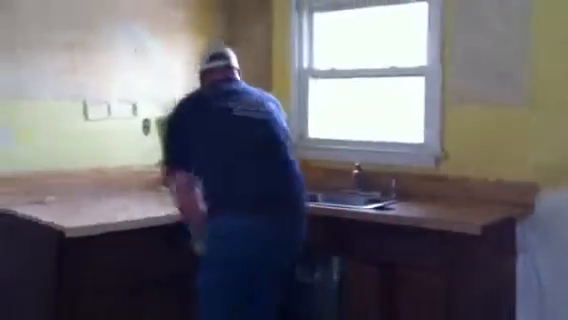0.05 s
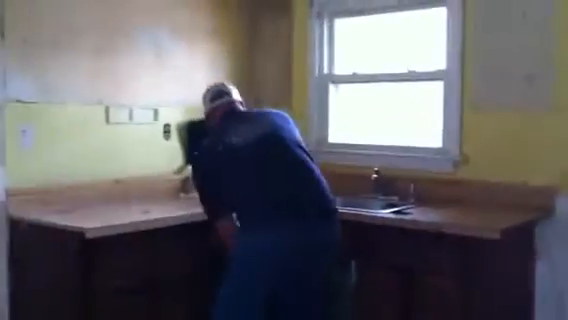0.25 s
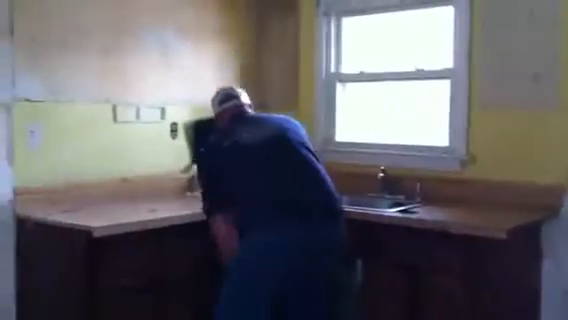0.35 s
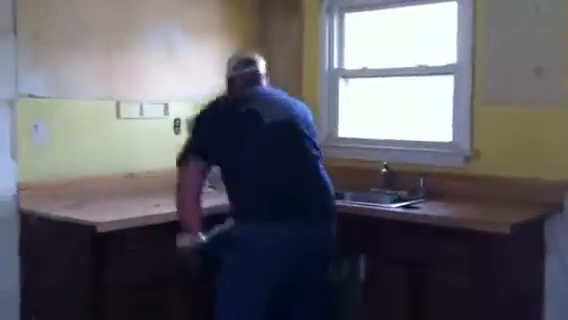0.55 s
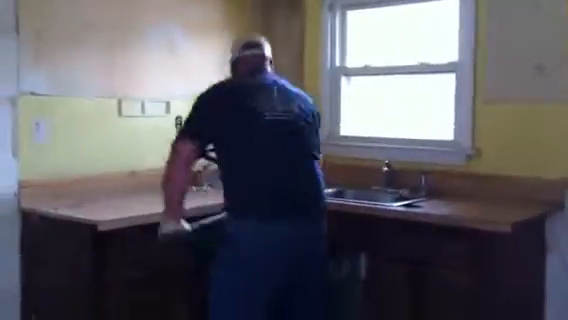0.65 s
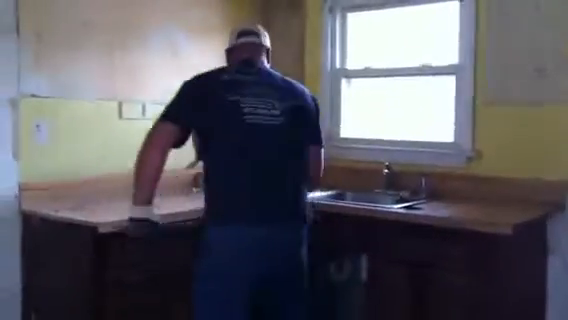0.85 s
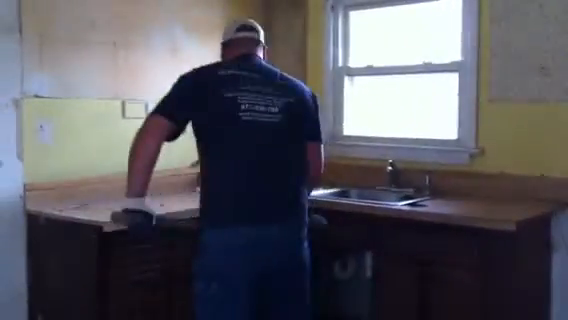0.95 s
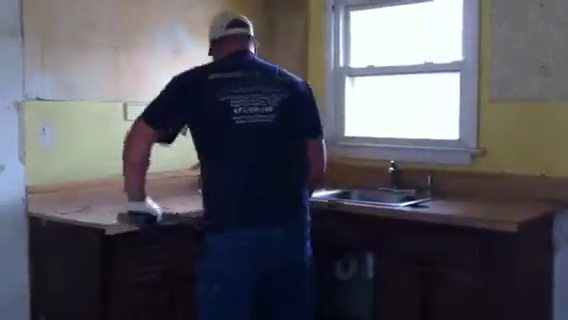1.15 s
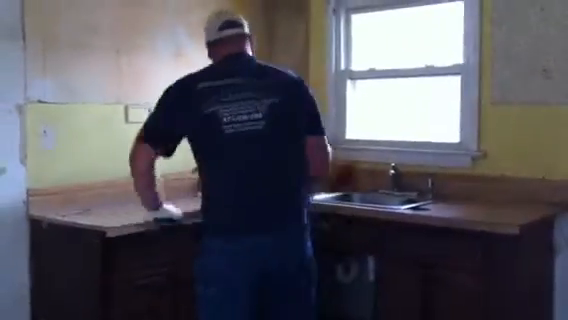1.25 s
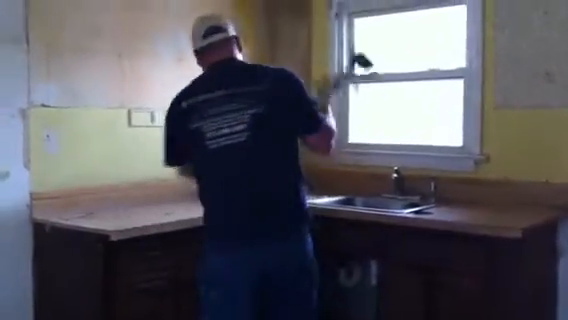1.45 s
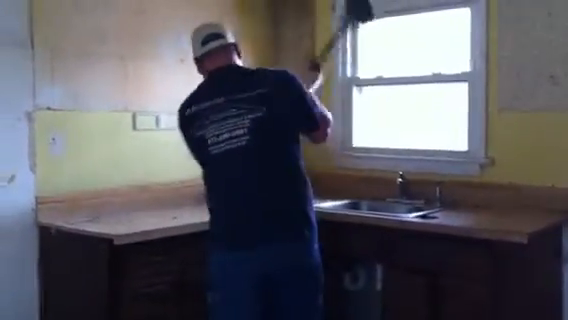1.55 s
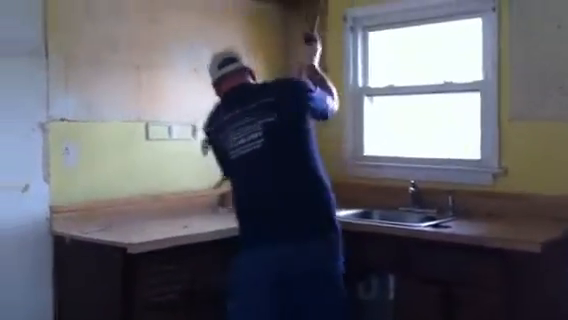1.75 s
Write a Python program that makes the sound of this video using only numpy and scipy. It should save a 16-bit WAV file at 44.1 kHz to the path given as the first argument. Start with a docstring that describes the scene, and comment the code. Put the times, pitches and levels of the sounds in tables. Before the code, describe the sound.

Wood breaks and drags in an empty, echoing kitchen, heard from a few steps away: scrapes and cracks build to a booming crash, clatter on briefly, then a sharp countertop knock, soft rubbing, a light tap and quiet.

```python
"""Cabinet panel wrenched loose in a bare kitchen

The panel scrapes, a nail squeaks, wood cracks, then it crashes down with a carcass boom and splinters.
A hard knock on the countertop, dull rubs, a light tap, a sleeve rustle as the hammer is raised, and grit.
Breaks, drag and nail are random clicks, filtered; carcass and countertop are decaying modes; rubs and air
are coloured noise. Bare walls ring after all but the two sets of modes and the air."""
import sys
import numpy as np
from scipy import signal
from scipy.fft import rfft, irfft, next_fast_len
from scipy.io import wavfile

SR = 44100
rng = np.random.default_rng(int(sys.argv[2]) if len(sys.argv) > 2 else 0)


def digitize_waveform(pressure):
    """Quantize a signal to 16-bit integers and store it at the path in sys.argv[1].

    Rows of a 2-D input are taken as channels; values are limited to [-1, 1].
    """
    field = np.atleast_2d(pressure).T
    bounded = np.clip(field, -1, 1)
    quanta = np.round(bounded * 32767).astype(np.int16)
    wavfile.write(sys.argv[1], SR, quanta)


N = 79380
T = np.arange(N) / SR
HZ = np.maximum(np.fft.rfftfreq(2 * N, 1 / SR), 1)

# cracks and crashes: (start [s], splintering decay [s], thud [dB], wood [dB], crack [dB], splinter [dB])
BREAKS = [(0.028, 0.0069, -76, -70, -52.5, -66), (0.0435, 0.0071, -42.5, -54.5, -42, -56.5),
          (0.122, 0.0031, -49, -54, -59, -70), (0.152, 0.0018, -45.5, -56, -57, -64.5),
          (0.259, 0.007, -44, -55, -43, -52), (0.313, 0.0099, -34.5, -40, -46, -55.5),
          (0.368, 0.033, -39.5, -49.5, -47.5, -54.5), (0.561, 0.0073, -37.5, -45, -44, -59),
          (0.594, 0.039, -49, -49, -63, -56), (0.632, .010, -34.5, -57, -53, -68),
          (0.648, 0.014, -33, -36.5, -32.5, -40), (0.672, 0.024, -28, -38.5, -43, -66),
          (0.769, 0.021, -57, -40, -38, -43), (0.797, 0.0066, -70, -42, -54, -52),
          (0.853, 0.031, -53, -45, -40.5, -46.5), (0.915, 0.023, -52, -49, -61, -68),
          (1.064, .016, -56.5, -52.5, -59, -83)]
# lower edges of thud, wood, crack and splinter: [Hz]
BAND_EDGES_HZ = [95, 430, 1500, 5300]
# colour of breaking wood: (frequency [Hz], gain [dB])
WOOD_COLOUR = [(60, -19.5), (130, -3), (300, 6.5), (480, -3.5), (900, 2), (1500, -7.5), (3500, -6.5),
               (4800, -9.5), (6500, -15), (10500, -11.5), (13000, -16), (16000, -27.5)]
SNAPS_PER_S, SNAP_SPREAD = 1800, 0.9  # spread: log-size deviation

# carcass modes: (frequency [Hz], level [dB], T60 [s])
CARCASS_MODES = [(115.4, -16, 0.36), (153.5, 2.5, 0.39), (204.9, 4.5, 0.32), (242.8, -7, 0.91),
                 (264, -13.5, .6), (306.7, -7, 0.83), (373, -24, 0.25), (427.5, -10.5, 0.39),
                 (612.5, -13.5, 1), (693, -14.5, 0.84), (874, -16.5, 1), (898, -29, 0.52)]
# heavy blows on the carcass: (time [s], level [dB])
BOOMS = [(0.316, -30.5), (0.660, -12.5)]
BOOM_RISE_S = 0.0091

# panel drag and sliding debris: (time [s], level [dB])
DRAG_LEVEL = [(0, -24.5), (.1, -35), (.21, -26.5), (.27, -25.5), (.34, -30.5), (.44, -27), (.53, -31.5),
              (.63, -31.5), (.72, -23), (.82, -27), (.9, -59), (.97, -65), (1.1, -76), (1.8, -71)]
# colour of wood dragged on wood: (frequency [Hz], gain [dB])
DRAG_COLOUR = [(30, -37.5), (70, -15.5), (150, 1.5), (260, 4), (400, -1.5), (520, -4), (900, -7.5),
               (1800, -12), (3800, -13), (6500, -18), (10500, -24.5), (16000, -32)]
SLIPS_PER_S, SLIP_SPREAD = 1400, 0.51

# resonances of a nail pulling out: (frequency [Hz], width [Hz], gain [dB])
NAIL_RESONANCES = [(2690, 420, -1.5), (3560, 300, 3.5), (5630, 180, -4)]
NAIL_START_S, NAIL_DECAY_S, NAIL_DB = 0.259, 0.012, -42

# knocks on the countertop: (time [s], level [dB], treble tilt [dB/octave])
KNOCKS = [(1.1523, -37, 0.5), (1.522, -57, 1)]
# colour of the contact before tilt: (frequency [Hz], gain [dB])
KNOCK_COLOUR = [(60, -22), (150, -8), (280, 2), (420, -6.5), (700, -1.5), (1150, 3), (1600, -3),
                (2300, -5.5), (4700, -8), (6000, -23), (11000, -22), (16000, -36)]
# countertop modes: (frequency [Hz], level [dB], T60 [s])
COUNTER_MODES = [(1012, -3, .5), (1081, 0, .42), (1171, -9, .38), (1245, -6, .38), (2051, -10, .28),
                 (2126, -9, .35), (2607, -8, .2), (4620, -16, .42), (4790, -16, .42)]
CONTACT_RISE_S = 0.0009  # the contact softens in: time constant of its onset [s]
CHATTER_DECAY_S = 0.0093
CHATTER_DB, COUNTER_RING_DB = -2, 6  # re first contact, re clack

# soft rubs: (peak time [s], Gaussian half length [s], level [dB], centre [Hz], Gaussian width [octaves])
RUBS = [(1.313, 0.028, -37, 1010, 0.55), (1.324, 0.08, -40.5, 296, 0.41), (1.414, 0.066, -42.5, 754, 0.29),
        (1.689, 0.041, -48, 3140, 1.2)]

# landing crumbs of grit: (time [s], level [dB])
GRIT = [(1.28, -65.5), (1.355, -73), (1.438, -76.5), (1.564, -80), (1.614, -80)]
GRIT_LO_HZ, GRIT_HI_HZ = 4500, 12000

# colour of the quiet air: (frequency [Hz], gain [dB])
AIR_COLOUR = [(30, -28), (80, -4), (150, 14), (300, 7.5), (500, 0), (1000, 4.5), (2000, 4), (4500, -6.5),
              (7000, -16.5), (16000, -19)]
AIR_DB = -48.5

# room reverberation: (frequency [Hz], T60 [s])
ROOM_T60 = [(100, 0.62), (300, 0.55), (1000, 0.58), (2500, 0.66), (5000, 0.5), (10000, 0.43), (16000, 0.22)]
DIRECT_DB, EARLY_DB = -5.5, -1.5  # re tail, before the whole response is normalised
EARLY_DECAY_S, ROOM_GAP_S = 0.012, 0.001

TOP_HZ = 15850


def amp(db):
    """Decibels to gain."""
    return 10 ** (np.asarray(db) / 20)


def unit(x):
    """Scale to the energy of one second at full level."""
    return x / np.sqrt(np.sum(x ** 2) / SR + 1e-20)


def contour(points):
    """Join (frequency [Hz], value) points on a log-frequency axis."""
    hz, value = np.array(points, float).T
    return np.interp(np.log(HZ), np.log(hz), value)


def colour(x, gain):
    """Causal minimum-phase filter, built by folding the cepstrum of the gain."""
    cepstrum = irfft(np.log(gain + 1e-7))
    cepstrum[1:N] *= 2
    cepstrum[N + 1:] = 0
    response = np.exp(rfft(cepstrum))
    return irfft(rfft(x, 2 * N) * response)[:N]


def band(lo_hz, hi_hz):
    """Gain of a steep band-pass."""
    return ((1 + (lo_hz / HZ) ** 10) * (1 + (HZ / hi_hz) ** 10)) ** -0.5


def at(x, start_s):
    """Delay a sound to its start time."""
    delay = int(np.clip(start_s, 0, T[-1]) * SR)
    return np.concatenate([np.zeros(delay), x])[:N]


def clicks(rate_per_s, spread):
    """Random clicks of either sign and log-normal size, clipped at two deviations."""
    hits = rng.random(N) < rate_per_s / SR
    signs = rng.choice([-1, 1], N)
    sizes = np.exp(spread * np.clip(rng.standard_normal(N), -2, 2))
    return hits * signs * sizes


def ring(modes):
    """Sum of exponentially decaying modes, each at a random phase."""
    out = 0
    for hz, db, t60_s in modes:
        out = out + amp(db - 60 * T / t60_s) * np.sin(2 * np.pi * (hz * T + rng.random()))
    return out


def heard(x, room):
    """A sound convolved with a room response."""
    return signal.fftconvolve(x, room)[:N]


def breaking(rooms):
    """Dying bursts of fibre snaps spread along the panel, from low thud to finest splinters."""
    size = next_fast_len(N + N // 4)
    edges_hz = BAND_EDGES_HZ + [SR]
    impulse = 1.0 * (T == 0)
    wood = amp(contour(WOOD_COLOUR))
    voices = [rfft(colour(impulse, wood * band(lo, hi)), size) for lo, hi in zip(edges_hz, edges_hz[1:])]
    paths = [rfft(room, size) for room in rooms]
    out = 0
    for start_s, decay_s, *levels_db in BREAKS:
        snaps = 0
        for path in paths:
            burst = clicks(SNAPS_PER_S / len(paths), SNAP_SPREAD) * np.exp(-T / decay_s)
            snaps = snaps + rfft(burst, size) * path
        for db, voice in zip(levels_db, voices):
            out = out + at(amp(db) * unit(irfft(snaps * voice, size)[:N]), start_s)
    return out


def carcass():
    """The hollow cabinet swells into its low modes under heavy blows."""
    swell = 1 - np.exp(-T / BOOM_RISE_S)
    return sum(at(amp(db) * ring(CARCASS_MODES) * swell, start_s) for start_s, db in BOOMS)


def dragging(room):
    """Wood sticks and slips on wood: dense coloured clicks under a level curve."""
    slips = unit(colour(clicks(SLIPS_PER_S, SLIP_SPREAD), amp(contour(DRAG_COLOUR))))
    time_s, level_db = np.array(DRAG_LEVEL).T
    return heard(slips * amp(np.interp(T, time_s, level_db)), room)


def squeak(room):
    """Quick slips of a nail in its hole ring a few narrow resonances."""
    gain = sum(amp(db) / (1 + (2 * (HZ - hz) / width_hz) ** 2) for hz, width_hz, db in NAIL_RESONANCES)
    slips = clicks(SNAPS_PER_S, SLIP_SPREAD) * np.exp(-T / NAIL_DECAY_S)
    return at(amp(NAIL_DB) * unit(heard(colour(slips, gain), room)), NAIL_START_S)


def knocking(rooms):
    """One hard contact and a brief chatter, with the countertop modes ringing."""
    out = 0
    for (start_s, db, tilt_db), room in zip(KNOCKS, rooms):
        chatter = heard(clicks(SNAPS_PER_S, SNAP_SPREAD) * np.exp(-T / CHATTER_DECAY_S), rooms[-1])
        contact = unit(room) + amp(CHATTER_DB) * unit(chatter)
        contact = contact * (1 - np.exp(-T / CONTACT_RISE_S))
        gain_db = contour(KNOCK_COLOUR) + tilt_db * np.log2(HZ / 1000)
        clack = unit(colour(contact, amp(gain_db)))
        out = out + at(amp(db) * (clack + amp(COUNTER_RING_DB) * ring(COUNTER_MODES)), start_s)
    return out


def rubbing(room):
    """Swells of band-limited noise: a dull slide over the countertop, then the rustle of a sleeve."""
    out = 0
    for peak_s, half_s, db, hz, octaves in RUBS:
        gain = np.exp(-0.5 * (np.log2(HZ / hz) / octaves) ** 2)
        grain = unit(colour(rng.standard_normal(N), gain))
        out = out + amp(db) * grain * np.exp(-0.5 * ((T - peak_s) / half_s) ** 2)
    return heard(out, room)


def grit(room):
    """Falling crumbs tick: band-passed room responses."""
    tick = unit(colour(room, band(GRIT_LO_HZ, GRIT_HI_HZ)))
    return sum(at(amp(db) * tick, start_s) for start_s, db in GRIT)


def quiet_air():
    """Steady coloured noise."""
    return amp(AIR_DB) * unit(colour(rng.standard_normal(N), amp(contour(AIR_COLOUR))))


def room_response():
    """Direct sound, quick reflections from the corner, and a tail that dulls as it fades."""
    noise = rfft(rng.standard_normal(N), 2 * N)
    t60_s = contour(ROOM_T60)
    half_octave = np.round(2 * np.log2(np.maximum(HZ, 128)))
    tail = 0
    for k in np.unique(half_octave):
        inside = half_octave == k
        fade = np.exp(-np.log(1000) * T / t60_s[inside].mean())
        tail = tail + irfft(noise * inside)[:N] * fade
    early = rng.standard_normal(N) * np.exp(-T / EARLY_DECAY_S)
    out = at(unit(tail) + amp(EARLY_DB) * unit(early), ROOM_GAP_S) / np.sqrt(SR)
    out[0] += amp(DIRECT_DB)
    return out / np.sqrt(np.sum(out ** 2))


def scene():
    """All sounds, from three places along the cabinet, over the quiet air."""
    rooms = [room_response() for _ in range(3)]
    panel = breaking(rooms) + carcass() + dragging(rooms[1]) + squeak(rooms[2])
    aftermath = knocking(rooms) + rubbing(rooms[0]) + grit(rooms[1])
    return (panel + aftermath + quiet_air())[None]


def record(dry):
    """The recorder rounds the highest peaks and cuts the top."""
    low_pass = signal.ellip(10, 0.2, 80, TOP_HZ, fs=SR, output="sos")
    return signal.sosfilt(low_pass, np.tanh(dry))


dry = scene()
out = record(dry)
digitize_waveform(out)
```